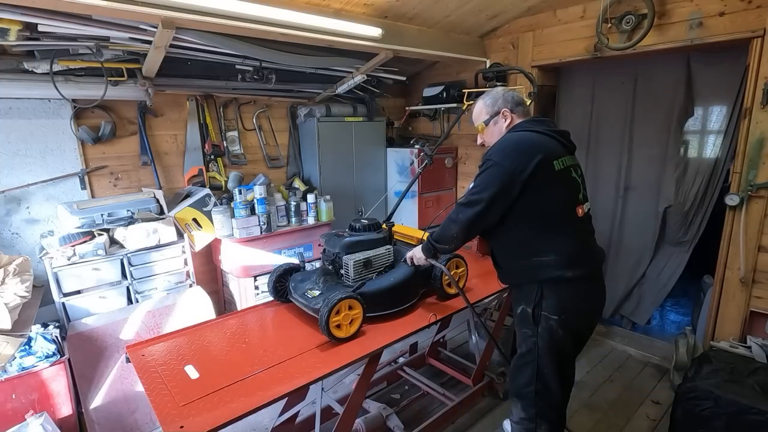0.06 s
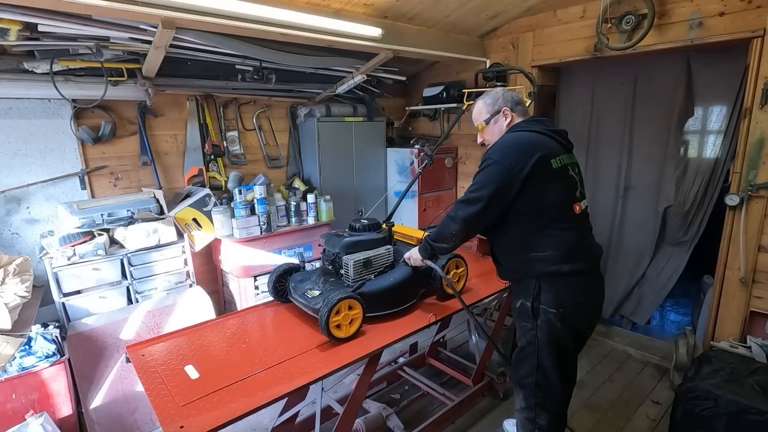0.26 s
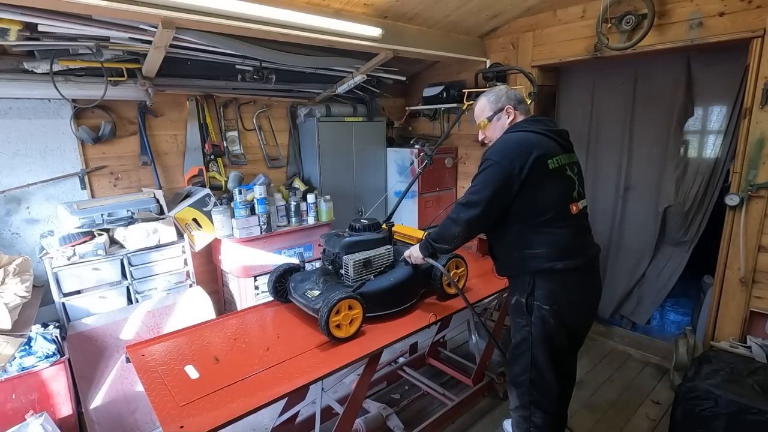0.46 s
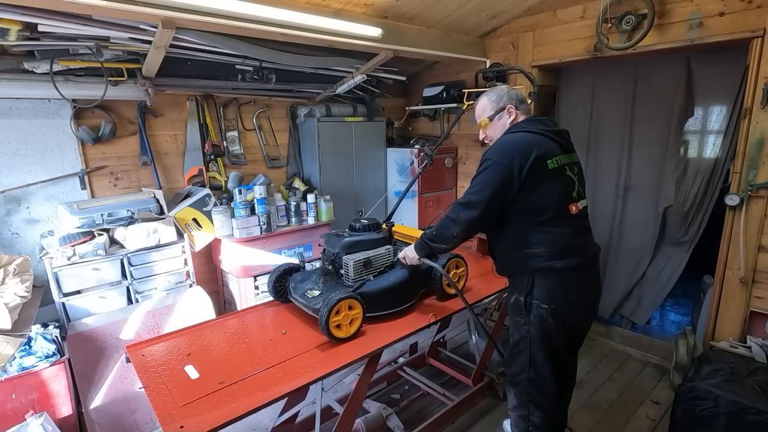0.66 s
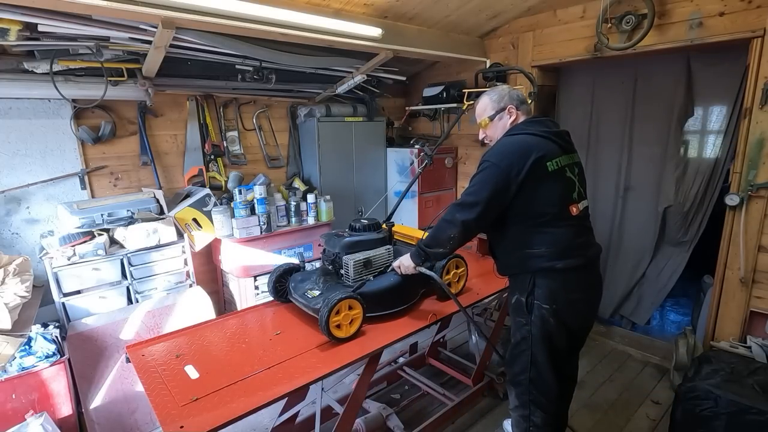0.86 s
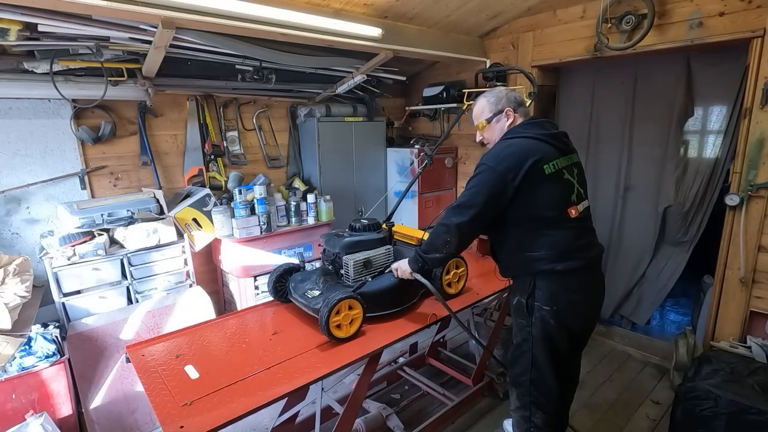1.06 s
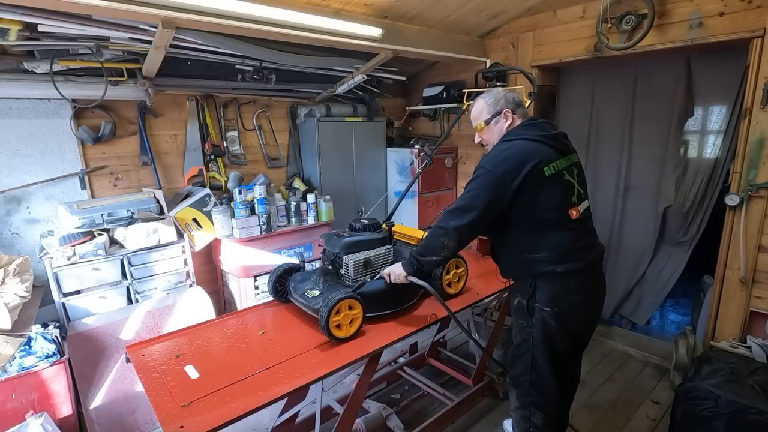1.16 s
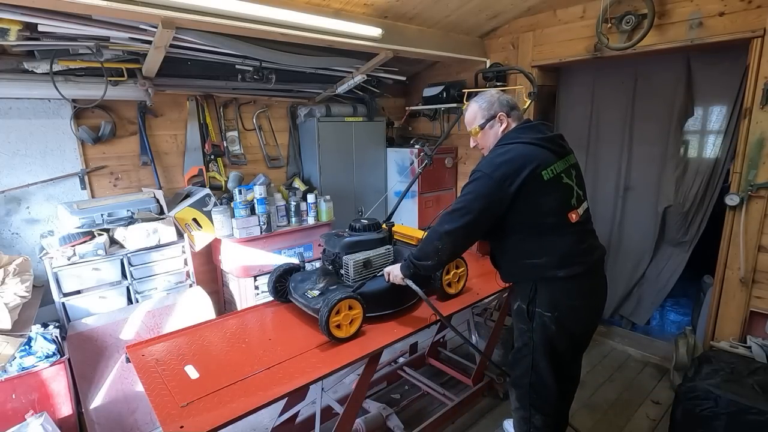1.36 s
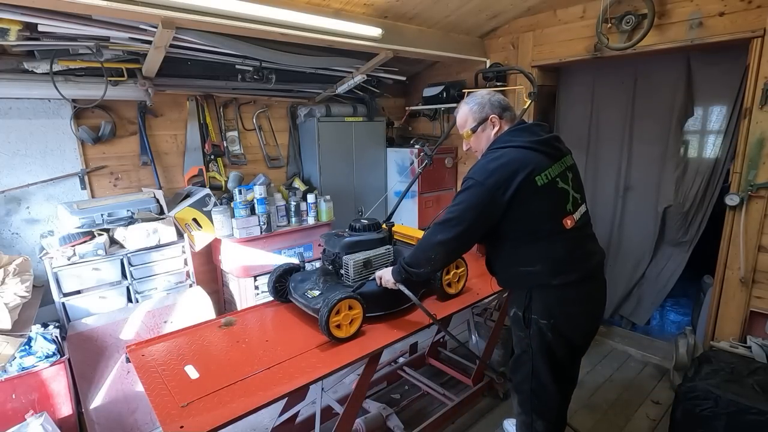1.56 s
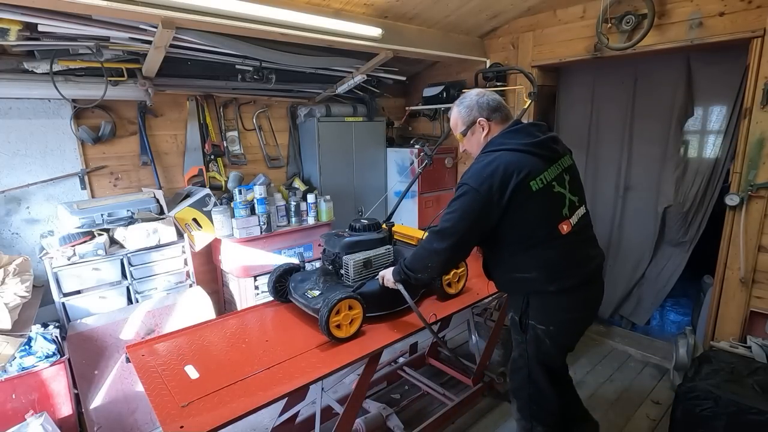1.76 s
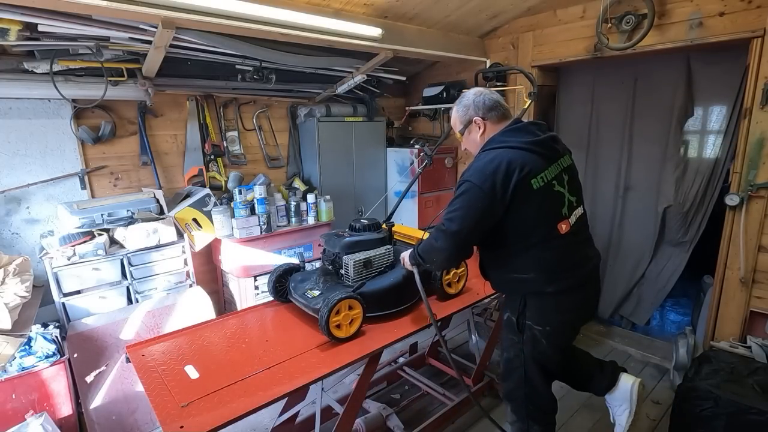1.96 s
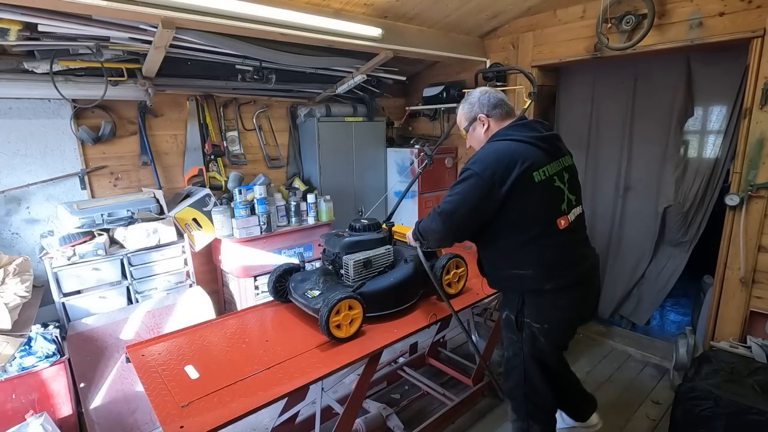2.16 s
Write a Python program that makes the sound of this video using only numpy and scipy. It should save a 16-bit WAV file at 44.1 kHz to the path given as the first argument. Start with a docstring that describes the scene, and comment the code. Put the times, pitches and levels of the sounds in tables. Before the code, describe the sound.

A compressed air gun snaps on at about 0.2 seconds and hisses in one long blast, roaring in a lawn mower's deck and whistling briefly on its edges. The mower knocks loudly near 0.85 seconds, then more lightly around 1.1, 1.3 and 1.75. At about 1.9 seconds the blast shuts off with a soft hose thump, leaving a faint airy whistle in the small workshop.

```python
"""A compressed air blow gun cleans a lawn mower on a steel bench in a wooden workshop.
One long blast hisses from the nozzle, roars in the mower's deck and sings briefly on the edges it sweeps.
With the trigger eased off, a thin flow whistles in the nozzle tube.
The mower knocks as it is handled, the hose thumps softly, and a faint air leak runs underneath."""
import sys
import numpy as np
from scipy import signal
from scipy.fft import rfft, irfft, next_fast_len
from scipy.io import wavfile
from scipy.ndimage import uniform_filter1d, map_coordinates

SR = 44100
rng = np.random.default_rng(int(sys.argv[2]) if len(sys.argv) > 2 else 0)


def output_pcm(signal):
    """Save a mono or channel-first signal as 16-bit PCM at the path in sys.argv[1].

    Samples are clipped to [-1, 1] before scaling.
    """
    pcm = np.clip(np.atleast_2d(signal).T, -1, 1) * 32767
    wavfile.write(sys.argv[1], SR, np.round(pcm).astype(np.int16))


N = 97020
TIME_S = np.arange(N) / SR


def amp(db):
    """Decibels to gain."""
    return 10 ** (np.asarray(db) / 20)


def unit(x):
    """x at rms 1."""
    return x / np.sqrt(np.mean(x ** 2) + 1e-20)


def along(points, hz):
    """Interpolate (Hz, value) points on a log frequency axis."""
    point_hz, values = np.transpose(points)
    return np.interp(np.log(hz + 1), np.log(point_hz + 1), values)


def curves(rows):
    """One value per sample for each column after the time."""
    times_s, *columns = np.transpose(rows)
    return [np.interp(TIME_S, times_s, column) for column in columns]


def wobble(knots_per_s):
    """Smooth random curve."""
    return map_coordinates(rng.standard_normal(N // 20), [TIME_S * knots_per_s], mode="wrap")


def filtered(x, response):
    """x through a complex frequency response."""
    size = next_fast_len(N + SR // 2)
    return irfft(rfft(x, size) * response(np.fft.rfftfreq(size, 1 / SR)), size)[..., :N]


def resonate(x, modes):
    """x through parallel (Hz, width Hz, dB) resonances of alternating sign."""
    return filtered(x, lambda f: sum(
        (-1) ** k * amp(db) * 1j * f * width_hz / (hz * hz - f * f + 1j * f * width_hz)
        for k, (hz, width_hz, db) in enumerate(modes)))


def ringing(modes):
    """Turbulence in resonances, at rms 1."""
    return unit(resonate(rng.standard_normal(N), modes))


def turbulence(spectrum, patchy_db):
    """Coloured noise at rms 1, with patches of random gain in time and frequency."""
    cells = signal.stft(rng.standard_normal(N), nperseg=512)[2]
    patches = uniform_filter1d(rng.standard_normal(cells.shape), size=4, axis=0)
    patches = uniform_filter1d(patches, size=14, axis=1)
    noise = signal.istft(cells * amp(patchy_db * unit(patches)), nperseg=512)[1][:N]
    return unit(filtered(noise, lambda hz: amp(along(spectrum, hz))))


def swells(rows, width_ratio):
    """Noise bands that each swell and fade once; bandwidth scales with pitch."""
    total = np.zeros(N)
    for middle_s, length_s, hz, db in rows:
        band = filtered(rng.standard_normal(N), lambda f: 1 / (1 + 2 * ((f / hz - 1) / width_ratio) ** 2))
        total += amp(db) * np.exp(-2 * ((TIME_S - middle_s) / length_s) ** 2) * unit(band)
    return total


def valve_db(lead_s=0):
    """Flow through the valve: opens, surges as the hose's stored pressure goes first, holds, shuts."""
    squeeze_s, full_s, shut_s = 0.19, 0.2404, 1.862
    range_db, surge_db, surge_s, shut_db_per_s = 37, 3.5, 0.037, 560
    t = TIME_S + lead_s
    opening = range_db * np.minimum(t - full_s, 0) / (full_s - squeeze_s)
    surge = surge_db * np.exp(-(np.maximum(t - full_s, 0) / surge_s) ** 2)
    return opening + surge - shut_db_per_s * np.maximum(t - shut_s, 0)


def background():
    """Steady noise of the workshop and a faint air leak."""
    # Each row: frequency in Hz, relative density in dB.
    spectrum = [(25,-11),(100,-1),(400,-1.5),(1000,-2),(2100,-6),(3600,-5.5),(5500,-13.5),(9500,-16),(11500,-30),(16000,-38)]
    return amp(-51) * turbulence(spectrum, patchy_db=1.5)


def workshop(x, wet_db):
    """x with the room's short reverberation, at the same total power."""
    # Each row: frequency in Hz, T60 in seconds.
    decay = [(400,0.78),(1500,0.49),(5000,0.13),(14000,0.26)]
    hz, t, cells = signal.stft(rng.standard_normal(SR // 2), SR, nperseg=256)
    tail = signal.istft(cells * amp(-60 * t / along(decay, hz)[:, None]), SR, nperseg=256)[1]
    tail = np.pad(tail / np.linalg.norm(tail), (130, 0))  # 3 ms pre-delay
    return (x + amp(wet_db) * signal.fftconvolve(x, tail)[:N]) / np.hypot(1, amp(wet_db))


def room_boom():
    """The blast stirs the room's low modes, which ring on for a moment."""
    drive = amp(valve_db()) * rng.standard_normal(N)
    return amp(-56.5) * unit(resonate(drive, modes=[(221.5, 26, -4.5), (137, 7.7, -9.5)]))


def hose_thumps():
    """The hose thumps softly: low swells of noise."""
    # Each row: middle in seconds, length in seconds, pitch in Hz, level in dB.
    thumps = [(.7,0.09,70.7,-56),(1.865,0.026,72,-47.5)]
    return swells(thumps, width_ratio=0.71)


def mower_body(force, contact_hz=3500):
    """The mower's damped body, driven through a soft contact that cuts the treble."""
    # Each row: frequency in Hz, width in Hz, gain in dB.
    modes = [(400,140,-6),(550,165,0.5),(760,270,-2.5),(1150,300,-5.5),(2500,1200,-15)]
    return filtered(resonate(force, modes), lambda hz: 1 / (1 + 1j * hz / contact_hz))


def mower_knocks(rise_s=0.006, t60_s=0.19, low_cut_hz=700):
    """Each dull blow rings the body and leaves small loose parts rattling, with little bass."""
    # Each row: start in seconds, peak of the blow in dB, level of the rattle in dB.
    knocks = [(.008,-41,-45),(.204,-39,-43),(.848,-13.5,-26.5),(.8516,-21,-36),(1.077,-21,-31),(1.3212,-21,-29),(1.347,-21.5,-35),(1.75,-25,-33)]
    blows, rattle_power = np.zeros(N), np.zeros(N)
    for start_s, blow_db, rattle_db in knocks:
        blows[int(start_s * SR)] += amp(blow_db)
        age_s = np.maximum(TIME_S - start_s, 0)
        rattle_power += np.minimum(age_s / rise_s, 1) * amp(rattle_db - 60 * age_s / t60_s) ** 2
    thud = mower_body(blows) / np.abs(mower_body(signal.unit_impulse(N))).max()
    chatter = filtered(rng.standard_normal(N), lambda hz: hz / np.hypot(hz, low_cut_hz))
    return thud + np.sqrt(rattle_power) * unit(mower_body(chatter))


def thin_flow(flutter_db=2.4, waver_s=0.00012):
    """A barely open valve lets the nozzle tube whistle airily; the flow hoots across hollows."""
    # Each row: frequency in Hz, width in Hz, relative gain in dB.
    tube_modes = [(3067,58,-1),(5180,120,-3.5),(7140,97,-2),(8840,420,-16.5)]
    # Each row: time in seconds, whistle level in dB.
    strength = [(.18,-70),(.205,-48),(.32,-66),(1.72,-54),(1.84,-45),(1.965,-43.5),(1.992,-49.5),(2.06,-45.5),(2.13,-42),(2.2,-46.5)]
    # Each row: time in seconds, pitch shift as a fraction.
    bends = [(2.01,0),(2.06,-.012),(2.2,.012)]
    # Each row: middle in seconds, length in seconds, pitch in Hz, level in dB.
    hoots = [(1.95,0.15,1715,-48),(2.172,0.12,695,-52.5)]
    (level_db,), (bend,) = curves(strength), curves(bends)
    bent_s = TIME_S + np.cumsum(bend) / SR
    whistle = np.zeros(N)
    for mode in tube_modes:
        flutter = amp(flutter_db * wobble(knots_per_s=55))
        tone = resonate(rng.standard_normal(N), [mode])
        read_s = bent_s + waver_s * wobble(knots_per_s=35)  # pitch wanders
        whistle += flutter * map_coordinates(tone, [SR * read_s], mode="mirror")
    flowing = TIME_S > strength[0][0]
    return flowing * amp(level_db) * unit(whistle) + swells(hoots, width_ratio=0.12)


def edge_tones():
    """The jet sings briefly on each edge or hollow it crosses."""
    # Each row: middle in seconds, length in seconds, pitch in Hz, level at steady flow in dB.
    edges = [(.245,0.031,4820,-33.5),(.39,0.27,5650,-36),(.5,0.34,6580,-39.5),(.52,0.61,4300,-41.5),(.69,0.08,7100,-45),(.97,0.18,5150,-41),(1.05,0.21,11700,-42.5),(1.15,0.064,5200,-36.5),(1.39,0.11,11860,-38),(1.45,0.058,4640,-37.5),(1.56,0.25,1136,-37.5),(1.56,0.23,2160,-37)]
    return swells(edges, width_ratio=0.07)


def edge_slide(width_hz=170):
    """The jet slides along an edge: an airy whistle climbs, then holds."""
    # Each row: time in seconds, pitch in Hz, level at steady flow in dB.
    glide = [(1.52,4000,-70),(1.605,4150,-40),(1.665,4650,-35.5),(1.70,4760,-45),(1.75,4900,-39),(1.86,4930,-38.5)]
    pitch_hz, level_db = curves(glide)
    breath = unit(filtered(rng.standard_normal(N), lambda hz: 1 / (1 + (hz / width_hz) ** 2)))
    return amp(level_db) * unit(breath * np.sin(2 * np.pi * np.cumsum(pitch_hz) / SR))


def deck_roar():
    """The jet roars in the deck and drives the hollow resonances of deck and bench."""
    # Each row: frequency in Hz, relative density in dB.
    spectrum = [(150,-34),(350,-19.5),(520,-4),(1100,2.5),(1500,-1),(4000,-17.5)]
    # Each row: frequency in Hz, width in Hz, relative gain in dB.
    modes = [(480,88,-1.5),(818,53,3),(940,80,5),(1067,113,4.5),(1252,41,-0.5),(1356,32,-2),(1520,49,3),(2123,42,5)]
    # Each row: time in seconds, drive in dB.
    aim = [(.26,-38.5),(.33,-43),(.6,-43),(.66,-39.5),(.82,-39.5),(1.04,-44),(1.11,-37.5),(1.25,-36.5),(1.29,-43),(1.4,-40),(1.46,-35),(1.63,-35),(1.71,-41),(1.78,-36.5),(1.86,-38)]
    roar = amp(0.5) * turbulence(spectrum, patchy_db=3.0) + amp(-2) * ringing(modes)
    return amp(curves(aim)[0]) * roar


def jet_rush(gain_db=2):
    """Midrange turbulence of the jet."""
    # Each row: frequency in Hz, relative density in dB.
    spectrum = [(25,-31),(70,-37),(200,-13),(330,-12),(550,-11),(1200,-6),(1900,-0.5),(2800,-2),(3700,-7.5),(5500,-18.5)]
    # Each row: time in seconds, level before gain in dB.
    levels = [(.275,-33),(.31,-33.5),(.6,-36),(.67,-33),(.9,-36),(1.06,-36.5),(1.22,-33),(1.31,-36.5),(1.55,-33.5),(1.72,-36),(1.86,-32.5)]
    return amp(curves(levels)[0] + gain_db) * turbulence(spectrum, patchy_db=2.0)


def jet_hiss(gain_db=1):
    """Treble turbulence of the jet."""
    # Each row: frequency in Hz, relative density in dB.
    spectrum = [(2000,-14),(3300,-14.5),(3850,-9),(4400,0.5),(7200,-0.5),(8100,-9.5),(11000,-24)]
    # Each row: time in seconds, level before gain in dB.
    levels = [(.3,-35),(.69,-35.5),(.77,-39),(1.16,-39),(1.3,-37),(1.55,-38),(1.72,-39.5),(1.86,-36)]
    return amp(curves(levels)[0] + gain_db) * turbulence(spectrum, patchy_db=3.0)


def nozzle_fizz(onset_s=0.218, rise_db_per_s=4000):
    """The finest fizz and the nozzle's resonances snap on while the valve is still opening."""
    # Each row: frequency in Hz, relative density in dB.
    spectrum = [(4500,-11.5),(8000,0.5),(9500,3.5),(13100,-11),(16000,-3)]
    # Each row: frequency in Hz, width in Hz, relative gain in dB.
    modes = [(8970,230,-0.5),(11790,470,1.5),(14100,420,-1.5)]
    onset = amp(np.minimum(rise_db_per_s * (TIME_S - onset_s), 0))
    return onset * (amp(-41.5) * turbulence(spectrum, patchy_db=6.0) + amp(-44) * ringing(modes))


def blast():
    """The jet and its sound on the mower, gated by the valve; the fizz peaks just ahead of the rest."""
    jet = deck_roar() + jet_rush() + jet_hiss()
    fizz = nozzle_fizz()
    singing = edge_tones() + edge_slide()
    return amp(valve_db()) * (jet + singing) + amp(valve_db(lead_s=0.006)) * fizz


def scene():
    """Gun and mower in the room, the same in both channels."""
    air = workshop(blast() + thin_flow(), wet_db=-9.5) + room_boom()
    handling = workshop(mower_knocks(), wet_db=-14) + hose_thumps()
    mono = air + handling + background()
    return np.array([mono, mono])


def record(dry):
    """Steep low-pass at the band limit."""
    top_hz = 15800
    return filtered(dry, lambda hz: 1 / (1 + (hz / top_hz) ** 400))


dry = scene()
out = record(dry)
output_pcm(out)
```